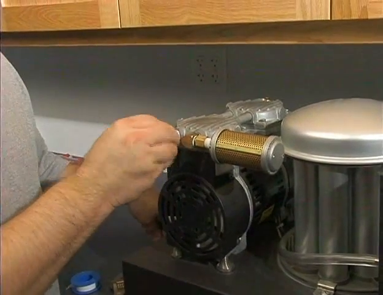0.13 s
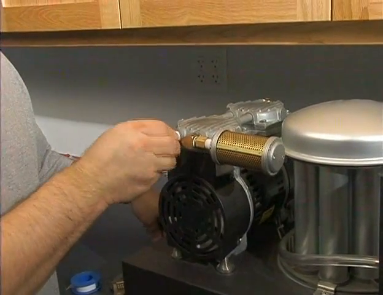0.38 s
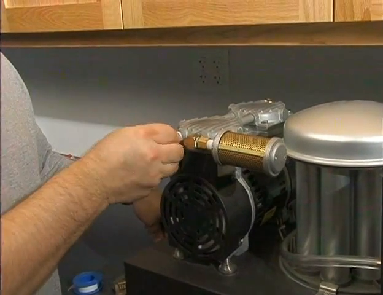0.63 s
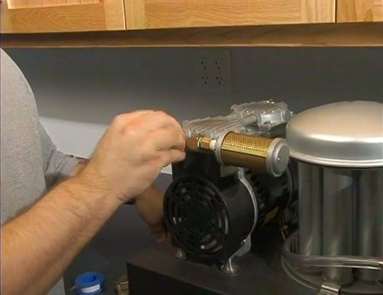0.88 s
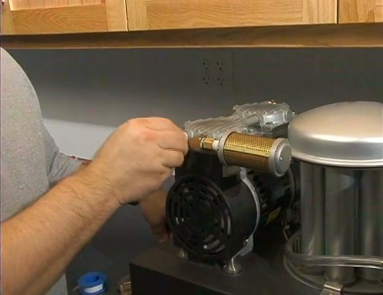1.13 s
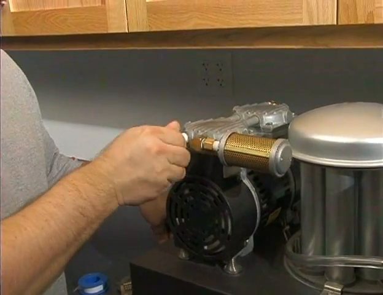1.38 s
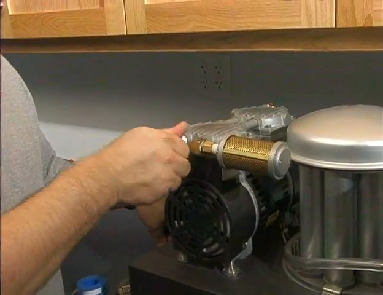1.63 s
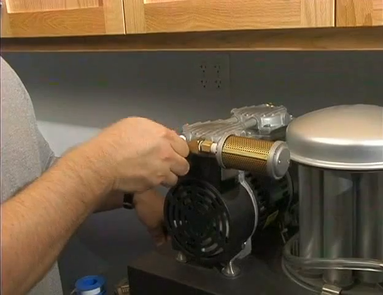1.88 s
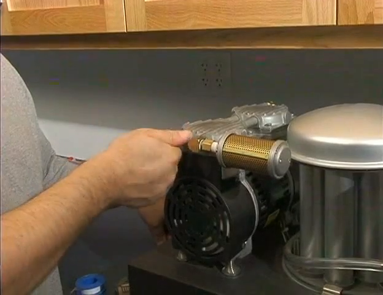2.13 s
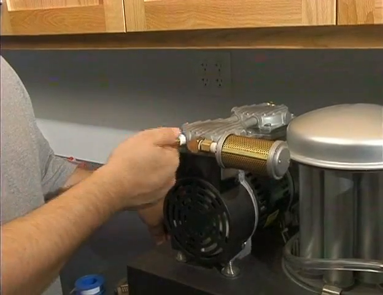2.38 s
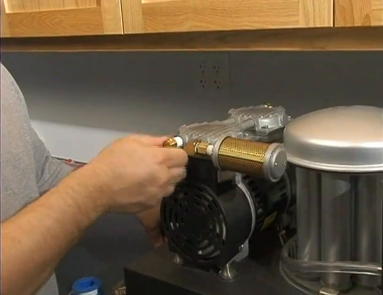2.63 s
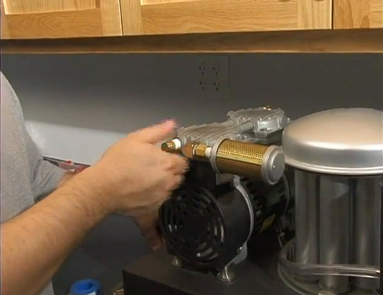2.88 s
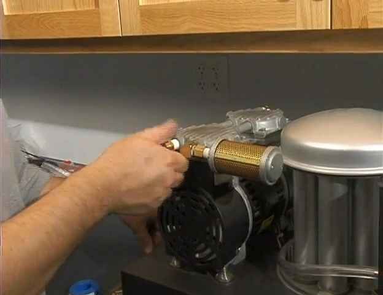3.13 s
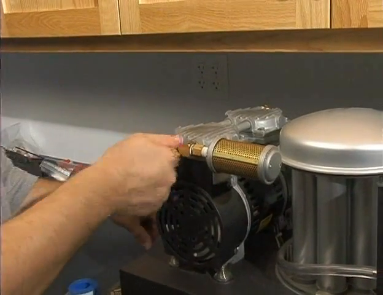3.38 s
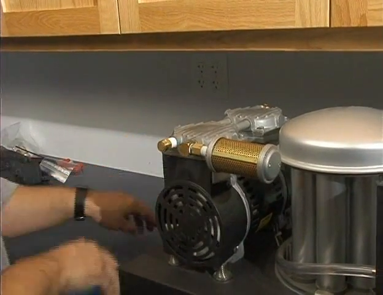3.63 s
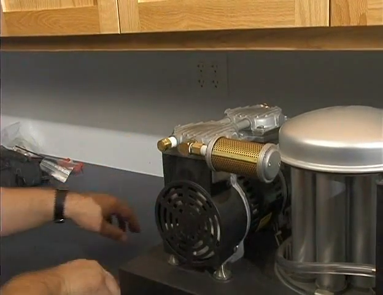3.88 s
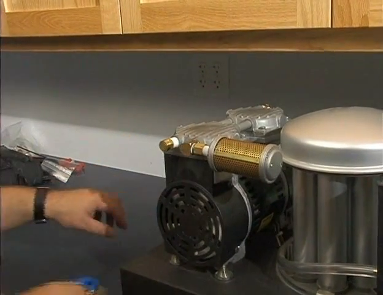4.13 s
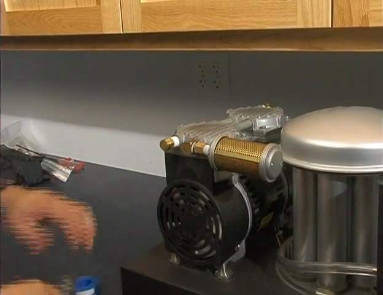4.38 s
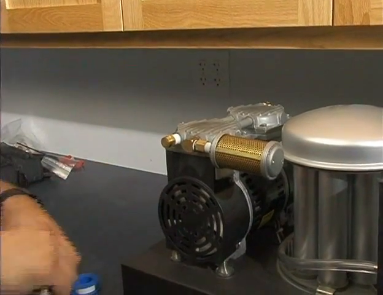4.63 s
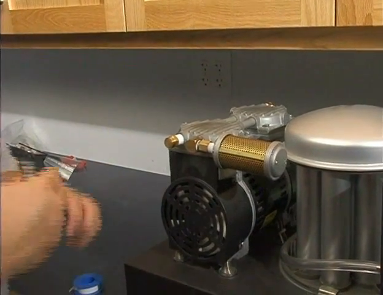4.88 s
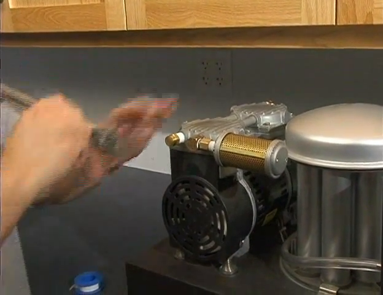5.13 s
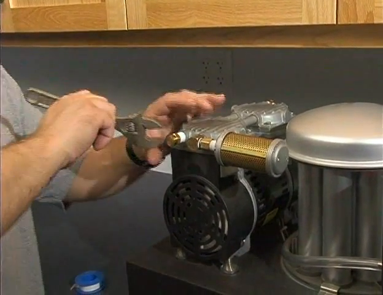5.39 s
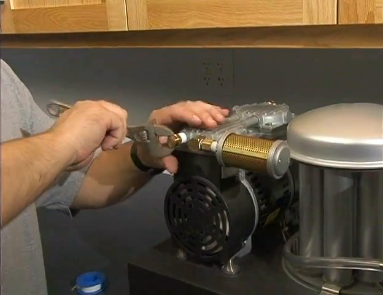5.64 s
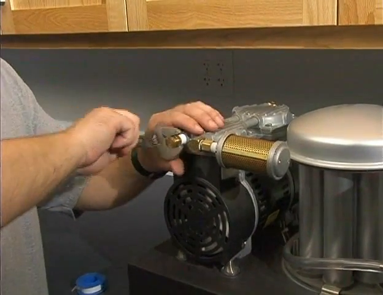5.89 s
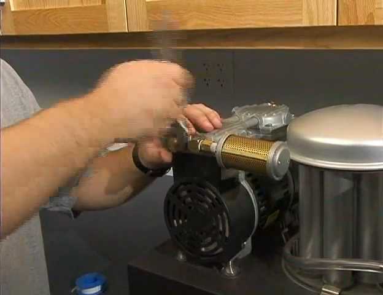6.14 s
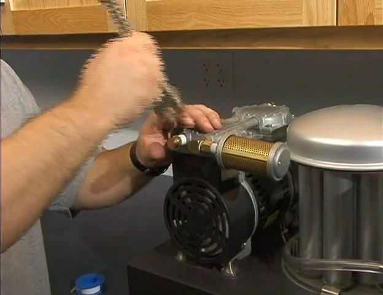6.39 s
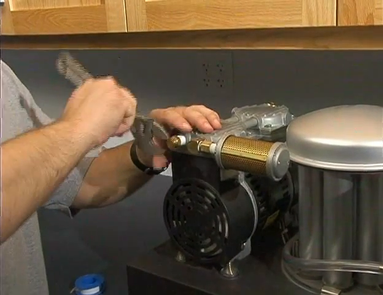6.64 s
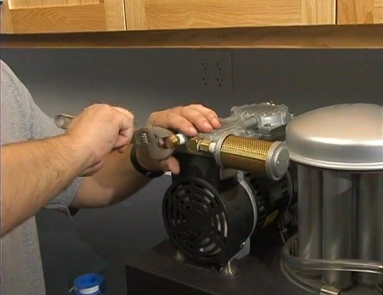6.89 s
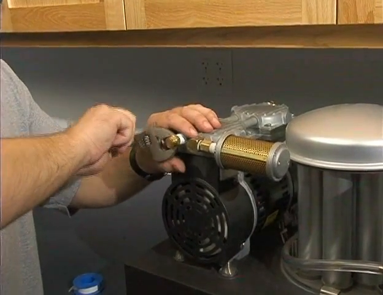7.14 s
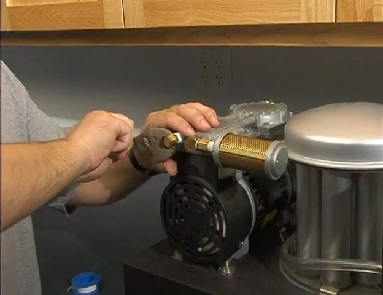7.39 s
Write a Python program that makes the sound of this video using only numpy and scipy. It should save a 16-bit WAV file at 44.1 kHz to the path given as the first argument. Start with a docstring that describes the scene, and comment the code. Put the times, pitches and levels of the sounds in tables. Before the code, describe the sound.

Small brass valve ticks and rubs as it is hand-screwed into a metal casting, then a steel wrench scrapes, jingles and clanks in a quiet room.

```python
"""A hand screws a small brass valve into the cast head of a compressor: ticks and thread rubs ring both.
A steel wrench is dragged off the counter, jingles, and is set on the valve and turned several times.
Blows are dying modes plus a short crack of noise; rubs are many tiny slips ringing modes of two bodies.
Around them: knocks and judders heard through the counter top, low thumps of the feet, brushing skin
and a short room tail. A quiet room lies below: rumble, mains hum, microphone hiss and thin whines."""
import sys
import numpy as np
from scipy import signal
from scipy.fft import rfft, irfft
from scipy.io import wavfile

SR = 44100
rng = np.random.default_rng(int(sys.argv[2]) if len(sys.argv) > 2 else 0)


def volts_from_decibels(level):
    """Turn decibel levels (scalar or array-like) into linear amplitude factors."""
    exponent = np.asarray(level, float) / 20
    return 10 ** exponent


def persist_wave(psi):
    """Save psi, clipped to +-1, as 16-bit WAV."""
    counts = np.round(np.clip(psi, -1, 1) * 32767).astype(np.int16)
    wavfile.write(sys.argv[1], SR, np.atleast_2d(counts).T)


N = 331632  # samples

# room noise and hiss, spectrum shape: pitch_hz, relative level_db (per Hz)
HUSH_SPECTRUM = [(12, -29), (20, -2), (60, -4), (138, -12), (255, -16), (301, -16.5), (472, -19),
                 (660, -23.5), (923, -27.5), (1570, -32.5), (1810, -34), (3530, -40), (12100, -42),
                 (14700, -48.5), (16000, -59)]
# drift of the low rumble, before its trim: start_s, level_db
RUMBLE_DRIFT = [(0.0, -52.5), (1.55, -54.5), (2.85, -52), (3.39, -60.5), (3.81, -49.5), (5.59, -64.5),
                (5.78, -44.5), (6.45, -71), (6.7, -54), (7.1, -46), (7.52, -47.5)]
# wavering mains hum: pitch_hz, level_db (rms), width_hz
HUM_TONES = [(58.3, -63, 0.89), (121.2, -64.5, 3.5), (178.8, -71.5, 39)]
# steady electronic whines: pitch_hz, level_db (rms)
WHINE_TONES = [(11838, -90), (15734, -79.5)]
# decay of the room tail: pitch_hz, t60_s
ROOM_DECAY = [(150, 0.54), (700, 0.29), (2500, 0.27), (8000, 0.25)]
# skin brushing a surface: start_s, end_s, level_db (before the swell shape), centre_hz, width_hz
SKIN_BRUSHES = [(3.618, 3.874, -74, 4000, 5000), (4.934, 5.077, -68.5, 5600, 6000),
                (5.446, 5.814, -68.5, 8300, 3630)]

# what each body rings with: pitch_hz, relative level_db, t60_s
FEET_MODES = [(43.6, -3, 0.64), (60.7, -6.5, 0.19), (82, 2.5, 0.12), (119.4, 9.5, 0.1), (136, -38, 0.076)]  # machine on its rubber feet
COUNTER_MODES = [(160, -4, 0.05), (208.3, 5, 0.088), (351.5, 2.5, 0.068), (396.5, -8.5, 0.11),
                 (502, -1.5, 0.057), (512, 9, 0.015), (750, 6, 0.047), (950, -2, 0.098),
                 (1275, -3.5, 0.045), (1500, 0, 0.046), (1980, 1, 0.027), (2300, 3, 0.02)]  # counter top
CASTING_MODES = [(595, -5, .06), (664, -3, .09), (745, -7, .06), (787, -15.5, .28), (980, -6, .08),
                 (1280, -9, .05), (1580, -6, .06), (1660, -6, .09), (1940, -2, .05), (2190, -3, .06),
                 (2345, -5, .05), (2620, -19, .32), (2745, -5, .06), (2840, -9, .09), (3330, -7, .035),
                 (4500, -20, .2)]  # cast compressor head
WRENCH_MODES = [(2190, -12, .04), (4124, -5, .04), (4190, -16, .09), (4800, -8, .02), (5500, -9, .015),
                (6450, -18, .06), (6680, -6, .03), (7200, -12, .012), (9250, -11, .015), (9850, -6, .025),
                (10420, -2, .025), (11130, -1, .025), (11460, -1, .03), (12000, -4, .025),
                (12800, -10, .02)]  # steel wrench
VALVE_MODES = [(3520, -2, .025), (3730, 0, .035), (4230, -5, .02), (5280, -4, .02), (5700, -5, .02),
               (6700, -8, .015), (8900, -12, .015)]  # brass valve

# the whole machine rocks on its feet: start_s, level_db
FOOT_THUMPS = [(3.654, -35), (3.688, -53), (4.059, -40), (5.755, -57), (5.999, -62), (6.262, -18),
               (6.347, -29.5), (6.974, -39), (7.278, -53)]
# knocks and juddering slips heard through the counter top, many under ticks and clanks:
# start_s, level_db, spot_hz, chatter_s
COUNTER_KNOCKS = [(0.376, -44.5, 623, 0.0093), (0.478, -56, 400, 0.0097), (1.993, -45, 300, 0.014),
                  (2.301, -41, 610, 0.012), (2.761, -45, 398, 0.012), (2.882, -38.5, 257, 0.045),
                  (3.042, -43.5, 700, 0.0045), (3.349, -48.5, 795, 0.0043), (3.524, -45, 790, 0.0037),
                  (3.621, -60, 600, 0.0038), (3.869, -32, 470, 0.0019), (3.925, -26.5, 420, 0.014),
                  (3.966, -30.5, 400, 0.0057), (3.982, -29.5, 700, 0.0036), (3.988, -28, 1300, 0.002),
                  (4, -32.5, 1500, 0.003), (4.006, -33, 750, 0.003), (4.018, -24.5, 440, 0.0023),
                  (4.031, -27.5, 513, 0.0043), (4.048, -39, 695, 0.003), (5.669, -38, 416, 0.0045),
                  (5.752, -44, 296, 0.0057), (6.012, -30, 490, 0.031), (6.264, -12, 440, 0.01),
                  (6.285, -28, 325, 0.011), (6.319, -32, 328, 0.006), (6.652, -39, 332, 0.012),
                  (6.862, -46.5, 330, 0.012), (6.975, -31.5, 292, 0.011), (7.067, -42, 453, 0.011),
                  (7.279, -43, 352, 0.0042)]
# wrench strikes and rattles: start_s, body_level_db, wrench_level_db, body_spot_hz, wrench_spot_hz
WRENCH_CLANKS = [(3.967, -60, -37.5, 800, 4950), (3.98, -31, -43, 1500, 4140),
                 (3.993, -31, -40, 1900, 4100), (4.017, -45, -55, 860, 5000), (4.024, -41, -47, 1220, 4180),
                 (4.053, -41, -60, 900, 4150), (4.058, -35, -28.5, 1910, 11300),
                 (4.062, -48, -32.5, 730, 4060), (4.196, -83, -67, 2270, 3960),
                 (4.27, -62.5, -66, 2300, 4100), (4.531, -58, -35, 840, 10400),
                 (4.534, -59, -46, 845, 4500), (4.564, -60, -34.5, 790, 10940),
                 (4.566, -62, -37.5, 786, 4124), (4.599, -55, -35, 1950, 6700),
                 (4.602, -61, -43, 686, 4124), (4.702, -55, -55, 714, 4800),
                 (5.601, -38.5, -41.5, 720, 9000), (5.615, -42, -60, 653, 4100),
                 (5.656, -41, -38.5, 656, 6770), (5.668, -44, -54, 670, 4180), (5.752, -49, -64, 660, 8020),
                 (5.812, -61, -52.5, 659, 4030), (5.82, -44, -70, 1640, 4100), (5.824, -49, -51, 657, 9800),
                 (5.851, -41, -55, 1550, 3870), (5.879, -72, -46, 659, 11000),
                 (5.899, -40, -39.5, 1930, 10900), (5.928, -46, -47.5, 650, 3900),
                 (5.944, -42, -45, 586, 9180), (5.992, -39.5, -52, 660, 4740),
                 (6.012, -49, -54.5, 660, 4050), (6.26, -25.5, -32.5, 1960, 4700),
                 (6.348, -35, -61, 1930, 4100), (6.353, -33.5, -38.5, 1920, 6900),
                 (6.359, -38, -60, 2840, 4100), (6.363, -41.5, -36, 980, 10400),
                 (6.397, -36, -39.5, 1920, 3680), (6.407, -36, -61, 808, 4100),
                 (6.413, -47, -71, 2640, 4100), (6.459, -66, -32, 777, 6700), (6.461, -56, -51, 1940, 4124),
                 (6.51, -54.5, -37.5, 756, 9100), (6.512, -57, -49.5, 2190, 4100),
                 (6.616, -55, -47.5, 2160, 6750), (6.728, -42, -43.5, 2140, 12300),
                 (6.736, -42.5, -73, 800, 4080), (6.808, -51, -70, 770, 4100),
                 (6.818, -62, -74, 2300, 4100), (6.842, -52, -74, 1940, 4150),
                 (6.854, -58, -70, 2180, 4120), (6.899, -58, -47.5, 2200, 10600),
                 (6.9, -62, -56.5, 2190, 4124), (6.973, -27.5, -28, 1930, 6860),
                 (6.979, -34.5, -63, 590, 4100), (7.063, -44, -67, 2920, 3800),
                 (7.067, -40, -41, 595, 10700), (7.261, -49.5, -54.5, 2000, 5000),
                 (7.278, -42.5, -80, 650, 4470), (7.472, -47, -72, 660, 3810),
                 (7.485, -59, -44.5, 840, 3830), (7.502, -39, -35.5, 1960, 5170)]
# valve ticks in its thread: start_s, casting_level_db, valve_level_db, casting_spot_hz, chatter_s
VALVE_TICKS = [(0.001, -51.5, -60, 1500, 0.036), (0.003, -58, -71, 4500, 0.004),
               (0.005, -59, -75, 2620, 0.0035), (0.238, -57, -54.5, 627, 0.0074),
               (0.27, -49.5, -47, 690, 0.01), (0.459, -47, -63, 597, 0.021),
               (0.461, -56.5, -69, 2630, 0.0073), (0.477, -52.5, -58, 1600, 0.0046),
               (0.776, -54, -58, 980, 0.057), (0.854, -44, -56.5, 1590, 0.0018),
               (0.918, -44, -49.5, 2150, 0.0056), (0.927, -48.5, -64, 1650, 0.0028),
               (0.93, -49.5, -59, 640, 0.0017), (0.936, -63, -78, 4500, 0.004),
               (0.938, -73, -78, 2800, 0.004), (1.042, -56, -63, 2190, 0.0074),
               (1.098, -59, -53, 2310, 0.017), (1.123, -55, -49.5, 615, 0.02),
               (1.145, -55, -51, 1300, 0.0048), (1.149, -48, -52.5, 650, 0.0035),
               (1.15, -40.5, -72, 1650, 0.0086), (1.237, -54.5, -71, 2980, 0.0078),
               (1.336, -65, -78, 2340, 0.0044), (1.408, -37, -39, 2750, 0.0016),
               (1.41, -41, -70, 1590, 0.0017), (1.425, -55, -40, 655, 0.0077),
               (1.483, -51.5, -70, 2340, 0.03), (1.587, -49.5, -58.5, 1670, 0.0049),
               (1.697, -61.5, -61, 2330, 0.0042), (1.94, -53.5, -59, 1590, 0.015),
               (1.995, -59, -76, 2140, 0.0065), (2.034, -53, -48.5, 2360, 0.015),
               (2.055, -64, -62, 590, 0.022), (2.153, -65, -75, 1540, .005), (2.171, -80, -75, 1550, .004),
               (2.209, -57.5, -56.5, 2310, 0.0035), (2.242, -56.5, -80, 660, 0.0019),
               (2.301, -48.5, -69, 666, 0.0028), (2.425, -59.5, -63, 590, 0.012),
               (2.485, -51.5, -73, 716, 0.0027), (2.699, -48.5, -76, 630, 0.021),
               (2.762, -45, -57, 666, 0.012), (2.784, -40.5, -48, 713, 0.0042),
               (2.829, -50, -57, 980, 0.024), (2.881, -45.5, -44.5, 1020, 0.015),
               (3.042, -55, -75, 670, 0.0056), (3.069, -62, -68, 2120, 0.015),
               (3.416, -42, -66, 710, 0.019), (3.448, -69, -77, 790, 0.0039)]

# rubbing strokes: peak_s, level_db, rise_s, fall_s (rise and fall each span 20 dB)
DRAG_STROKES = [(3.448, -46.5, 0.016, 0.025), (3.524, -55, 0.0047, 0.018), (3.768, -59, 0.17, 0.015),
                (3.994, -39, 0.081, 0.35), (4.075, -63, .02, 0.11)]  # wrench across the counter
GRIP_STROKES = [(5.625, -47, 0.032, 0.056), (5.67, -50, 0.033, 0.044), (5.826, -49.5, 0.048, 0.094),
                (5.86, -52, 0.03, 0.046), (5.94, -53, 0.05, 0.04), (5.996, -52, 0.02, 0.054),
                (6.38, -40.5, 0.069, 0.041), (6.8, -66, 0.16, 0.093), (6.855, -60.5, 0.03, 0.048),
                (7.12, -71, 0.066, 0.067), (7.272, -50, 0.036, 0.011), (7.51, -43, 0.044, 0.045)]  # wrench grinding
THREAD_STROKES = [(0.27, -60, 0.11, 0.12), (0.5, -73.5, 0.17, 1), (0.85, -67.5, 0.089, 0.014),
                  (1.2, -74, 0.063, 0.18), (2.06, -64, 0.088, 0.09), (2.49, -85, 0.059, 0.039),
                  (2.8, -66.5, 0.11, 0.26), (3.05, -64, 0.016, 0.022)]  # valve in its thread

HUSH_DB, RUMBLE_TRIM_DB, ROOM_DB = -58, -6.5, -15
SPOT_DB, HELD_SPOT_DB = 8, 6  # lift of the mode at the spot struck; less on metal damped by the grip
THROUGH_DB = -11.5  # how much of a contact's body blow is passed on to the counter
COUNTER_SPOT_HZ = 306  # under the machine's feet
WRENCH_CHATTER_S = 0.0044
FITTED_S = 5.5  # before this the wrench knocks on the counter, after it on the machine
DRAG_END_S = 4.012  # the wrench leaves the counter
SLIDE_DB, SLIDE_RISE_S, SLIDE_FALL_S = -12, 0.0029, 0.03  # tick or clank slides on a little
VALVE_SPOT_HZ, GLANCE_OCT_PER_DB = 4600, 0.03  # the more a tick stays in the valve, the higher it rings
GRIT_PER_S, GRIT_DB = 36, 0.5  # sparse grains catch in the thread


def evened(x):
    """Scales to an rms of 1."""
    return x / np.sqrt(np.mean(x ** 2) + 1e-20)


def read(points, hz):
    """Reads a spectrum on a log-frequency axis."""
    f, value = np.transpose(points)
    return np.interp(np.log(hz + 1), np.log(f + 1), value)


def band(x, hz, width):
    """A fixed resonance: shift down, smooth, shift back."""
    turn = np.exp(2j * np.pi * hz * np.arange(len(x)) / SR)
    r = np.exp(-np.pi * width / SR)
    return 2 * (turn * signal.lfilter([1 - r], [1, -r], x / turn)).real


def add(mix, s, sound):
    """Lays a sound into the mix, cut at its end."""
    part = mix[round(s * SR):][:len(sound)]
    part += sound[:len(part)]


def ring(modes, spot_hz, narrow_db, spot_db, crack_db, crack_s):
    """One blow: dying modes, strongest near the spot struck, and a short crack of noise near it."""
    hz, db, t60 = np.transpose(modes)[:, :, None]
    t = np.arange(11000) / SR
    away = np.minimum(abs(np.log2(hz / spot_hz)), 1.5)  # octaves
    lift = spot_db * np.exp(-(away / .06) ** 2)
    chance = 2.2 * rng.standard_normal(hz.shape)  # dB
    weight = volts_from_decibels(db - narrow_db * away + lift + chance)
    tones = (weight * volts_from_decibels(-60 * t / t60) * np.sin(2 * np.pi * hz * t)).sum(0)
    sos = signal.butter(4, [0.53 * hz.min(), 0.86 * hz.max()], "bandpass", fs=SR, output="sos")
    noise = signal.sosfilt(sos, rng.standard_normal(len(t)))
    for _ in range(2):
        noise = band(noise, spot_hz, 0.87 * spot_hz)
    crack = evened(noise) * volts_from_decibels(crack_db - 60 * t / crack_s)
    return np.array([tones / np.sqrt((weight ** 2).sum()), crack])


def chattered(blow, chatter_s):
    """Small bounces repeat the crack while the ring builds up."""
    t = np.arange(2000) / SR
    bounces = rng.standard_normal(len(t)) * (rng.random(len(t)) < .06) * np.exp(-t / chatter_s)
    bounces[0] = 1.0
    bounces /= np.linalg.norm(bounces)
    tones, crack = blow
    build = 1 - np.exp(-np.arange(len(tones)) / SR / (0.2 * chatter_s))
    return tones * build + signal.fftconvolve(crack, bounces)[:len(tones)]


def counter(spot_hz):
    """One blow on the counter top, with a weak crack."""
    return ring(COUNTER_MODES, spot_hz, 10.8, 0, -12.0, 0.091)


def knock(struck, struck_db, held, held_db, struck_hz, held_hz, chatter_s):
    """One contact rings the body struck, the counter and the held metal."""
    body = ring(struck, struck_hz, 14.0, SPOT_DB, -3, 0.034)
    body = volts_from_decibels(struck_db) * (body + volts_from_decibels(THROUGH_DB) * counter(COUNTER_SPOT_HZ))
    piece = volts_from_decibels(held_db) * ring(held, held_hz, 13.6, HELD_SPOT_DB, -2.5, 0.0084)
    # the light piece answers mostly to the first touches
    return chattered(body, chatter_s) + chattered(piece, 0.84 * chatter_s)


def slides(blows):
    """The short stroke that follows each blow."""
    return [(s + SLIDE_RISE_S, db + SLIDE_DB, SLIDE_RISE_S, SLIDE_FALL_S) for s, db, *_ in blows]


def rub(strokes, body, held, body_hz, held_hz, slips_per_s, held_db):
    """Many tiny uneven slips ring the body and the held metal while the contact moves."""
    t = np.arange(0, N + 32, 32) / SR  # coarse clock for the swells
    level = np.zeros(len(t))
    for s, db, rise, fall in strokes:
        level += volts_from_decibels(db - 20 * np.maximum((s - t) / rise, (t - s) / fall))
    slips = volts_from_decibels(4.9 * np.minimum(rng.exponential(1, N), 4)) * rng.choice([-1, 1], N)
    slips = slips * (rng.random(N) < slips_per_s / SR)
    body_ring = ring(body, body_hz, 9.3, 0, 8.8, 0.007).sum(0)[:3000]
    held_ring = ring(held, held_hz, 2.3, 0, 5.1, 0.083).sum(0)[:3000]
    low = evened(signal.oaconvolve(slips, body_ring)[:N])
    high = evened(signal.oaconvolve(slips, held_ring)[:N])
    return np.interp(np.arange(N) / SR, t, level) * (low + volts_from_decibels(held_db) * high)


def hush():
    """Steady room noise and hiss, a drifting rumble, wavering hum and fixed sine whines."""
    hz, t = np.fft.rfftfreq(N, 1 / SR), np.arange(N) / SR
    spectrum = rfft(rng.standard_normal(N)) * volts_from_decibels(read(HUSH_SPECTRUM, hz))
    out = volts_from_decibels(HUSH_DB) * evened(irfft(spectrum, N))
    rumble = evened(band(band(rng.standard_normal(N), 50, 97), 50, 97))
    drift_db = np.interp(t, *np.transpose(RUMBLE_DRIFT))
    out += volts_from_decibels(drift_db + RUMBLE_TRIM_DB) * rumble
    for f, db, width in HUM_TONES:
        waver = evened(band(rng.standard_normal(N), f, width))
        out += volts_from_decibels(db) * evened(1.65 * np.sin(2 * np.pi * f * t) + waver)
    for f, db in WHINE_TONES:
        out += volts_from_decibels(db) * np.sqrt(2) * np.sin(2 * np.pi * f * t)
    return out


def room(x):
    """Sparse taps of random sign, each band dying at its own speed."""
    taps = np.zeros(SR // 2)
    at = np.arange(200, len(taps) - 20, 20)
    taps[at + rng.integers(0, 20, len(at))] = rng.choice([-1., 1.], len(at))
    hz, t, z = signal.stft(taps, SR, nperseg=256)
    decay = volts_from_decibels(-60 * t / read(ROOM_DECAY, hz)[:, None])
    tail = signal.istft(z * decay, SR, nperseg=256)[1]
    return signal.fftconvolve(x, tail / np.linalg.norm(tail))[:N]


def skin_brushes():
    """Soft swells of band-limited hiss as skin passes over a surface."""
    out = np.zeros(N)
    for start, end, db, hz, width in SKIN_BRUSHES:
        size = round((end - start) * SR)
        hiss = band(band(rng.standard_normal(size), hz, width), hz, width)
        add(out, start, volts_from_decibels(db) * evened(hiss) * np.hanning(size) ** .5)
    return out


def foot_thumps():
    """Soft low pushes through the rubber mounts."""
    out = np.zeros(N)
    for s, db in FOOT_THUMPS:
        sound = chattered(volts_from_decibels(db) * ring(FEET_MODES, 80, 1.5, 0, -8, .12), .008)
        add(out, s, sound * signal.windows.tukey(len(sound), .1))
    return out


def counter_knocks():
    """Knocks and juddering slips heard through the counter top, many under ticks and clanks."""
    out = np.zeros(N)
    for s, db, spot_hz, chatter_s in COUNTER_KNOCKS:
        add(out, s, chattered(volts_from_decibels(db) * counter(spot_hz), chatter_s))
    return out


def wrench_clanks():
    """Steel strikes and rattles, on the counter first and on the casting once fitted."""
    out = np.zeros(N)
    for s, body_db, wrench_db, spot_hz, wrench_hz in WRENCH_CLANKS:
        body = CASTING_MODES if s > FITTED_S else COUNTER_MODES
        add(out, s, knock(body, body_db, WRENCH_MODES, wrench_db, spot_hz, wrench_hz, WRENCH_CHATTER_S))
    return out


def wrench_drag():
    """Steel slips along the counter top until it is lifted off."""
    lifted = volts_from_decibels(-200 * np.maximum(np.arange(N) / SR - DRAG_END_S, 0))  # fades at 200 dB/s
    return lifted * rub(DRAG_STROKES, COUNTER_MODES, WRENCH_MODES, 750, 3600, 2500, held_db=-22.5)


def wrench_scrapes():
    """Wrench grinding and a short scrape after every clank, all rung through casting and wrench modes."""
    strokes = GRIP_STROKES + slides(WRENCH_CLANKS)
    return rub(strokes, CASTING_MODES, WRENCH_MODES, 947, 7100, 1500, held_db=-23.5)


def thread_rubs():
    """Dense slips of the turning thread and a short scrape after every tick, with sparse grains catching."""
    strokes = THREAD_STROKES + slides(VALVE_TICKS)
    turning = rub(strokes, CASTING_MODES, VALVE_MODES, 910, 1830, 1600, held_db=-10.0)
    grit = rub(THREAD_STROKES, CASTING_MODES, VALVE_MODES, 1330, 3300, GRIT_PER_S, held_db=-30.0)
    return turning + volts_from_decibels(GRIT_DB) * grit


def valve_ticks():
    """Brass knocks in its thread, ringing the casting, the counter and itself."""
    out = np.zeros(N)
    for s, casting_db, valve_db, spot_hz, chatter_s in VALVE_TICKS:
        octaves = np.clip(GLANCE_OCT_PER_DB * (valve_db - casting_db), -.5, .5)
        valve_hz = VALVE_SPOT_HZ * 2 ** octaves
        add(out, s, knock(CASTING_MODES, casting_db, VALVE_MODES, valve_db, spot_hz, valve_hz, chatter_s))
    return out


def scene():
    """Hand work near the microphone, its room tail, and the quiet background."""
    work = skin_brushes() + foot_thumps() + counter_knocks()
    work += wrench_clanks() + wrench_drag() + wrench_scrapes()
    work += thread_rubs() + valve_ticks()
    return (work + volts_from_decibels(ROOM_DB) * room(work) + hush())[None]


def low_pass(x):
    """Removes everything above the highest recorded frequency."""
    return signal.sosfilt(signal.butter(12, 16000, fs=SR, output="sos"), x)


def record(dry):
    """Delivers the finished mix."""
    return low_pass(dry)


dry = scene()
out = record(dry)
persist_wave(out)
```